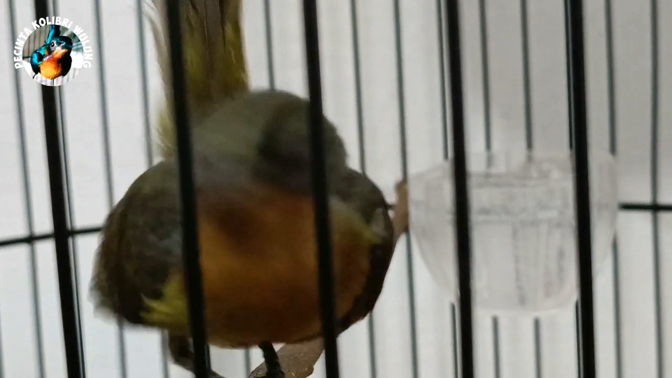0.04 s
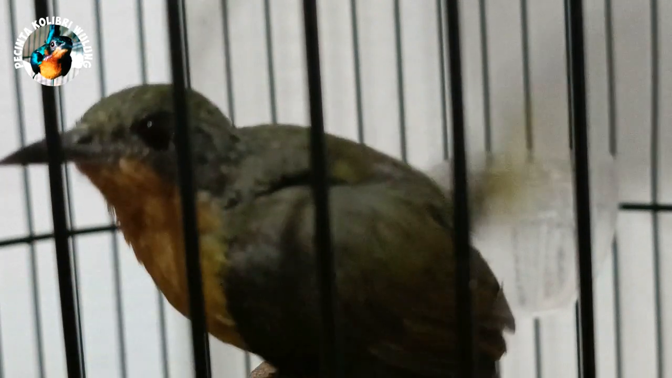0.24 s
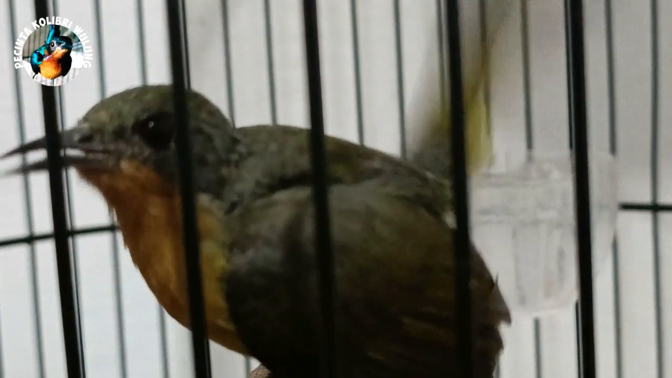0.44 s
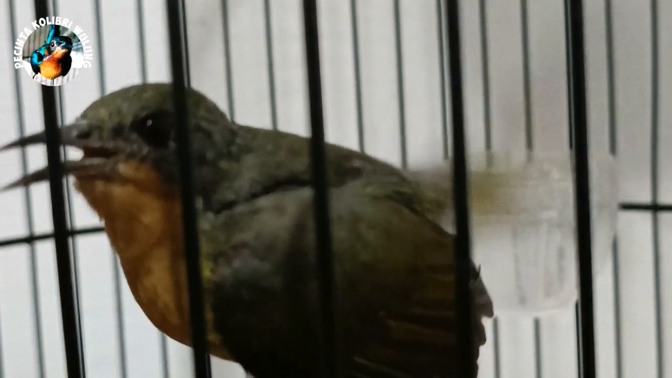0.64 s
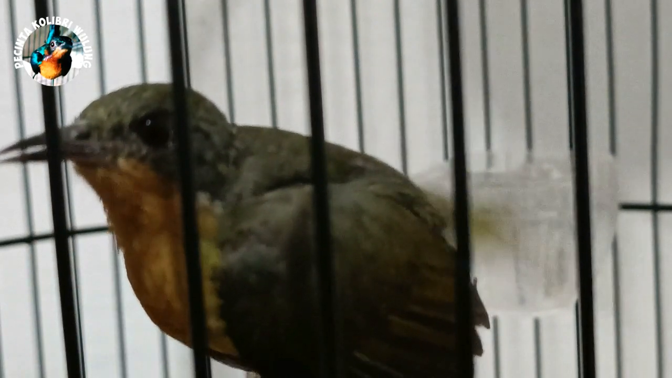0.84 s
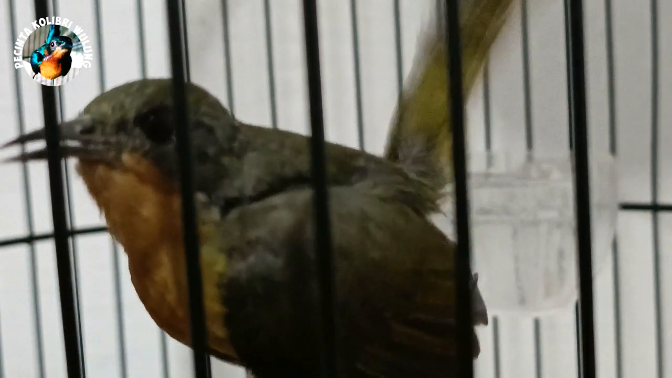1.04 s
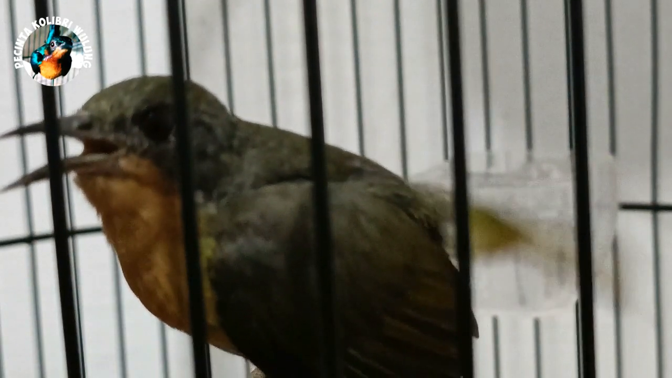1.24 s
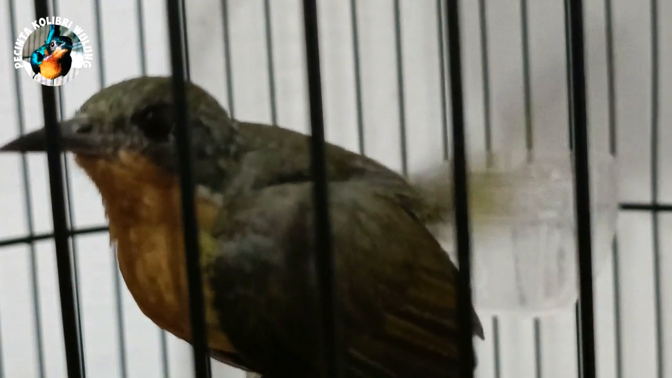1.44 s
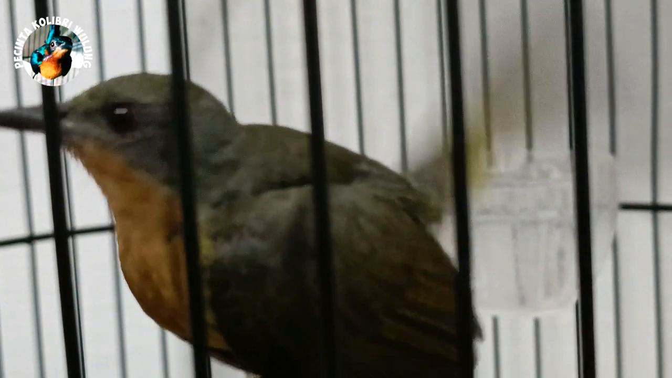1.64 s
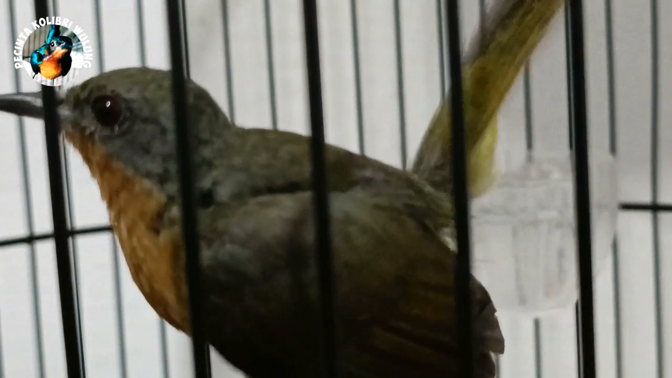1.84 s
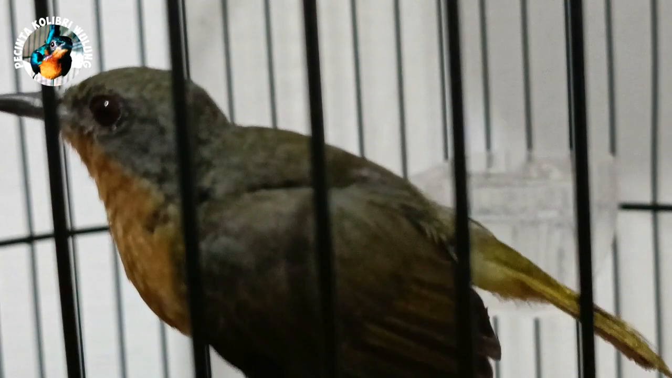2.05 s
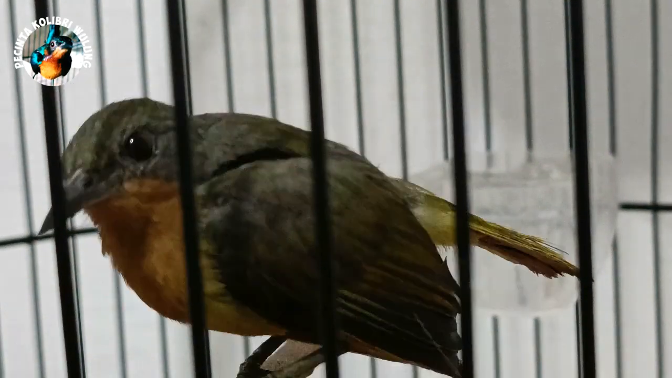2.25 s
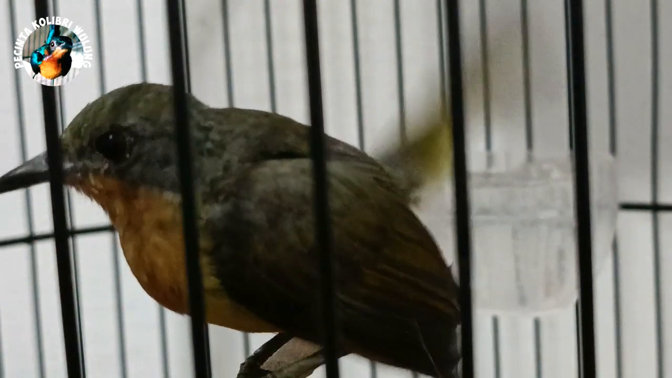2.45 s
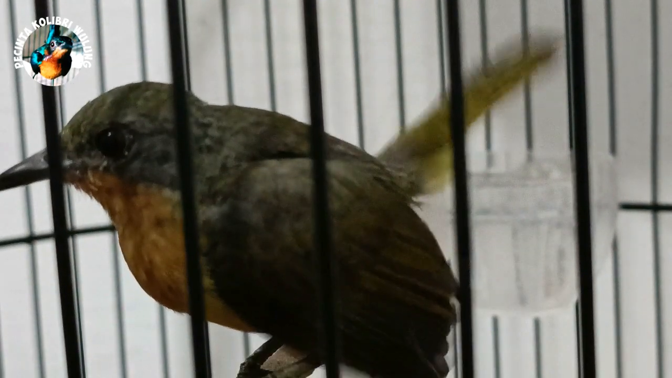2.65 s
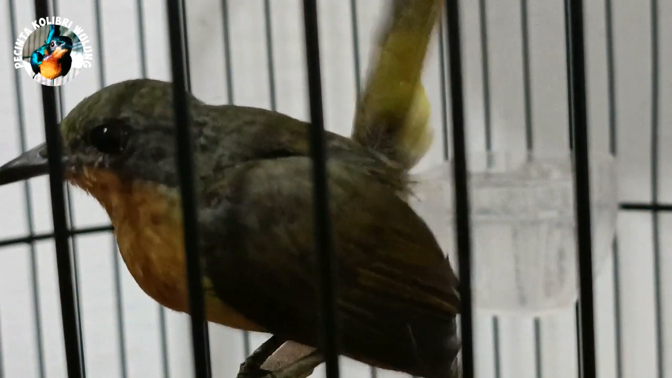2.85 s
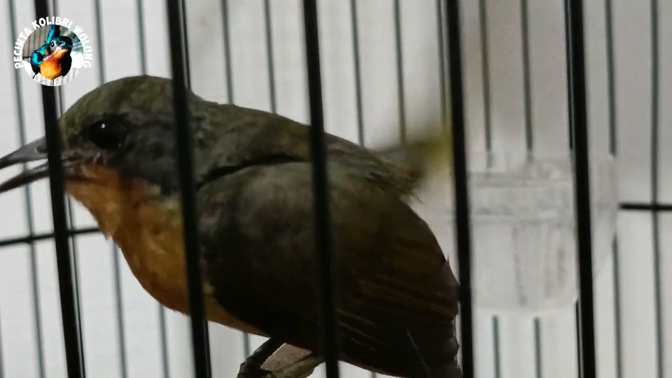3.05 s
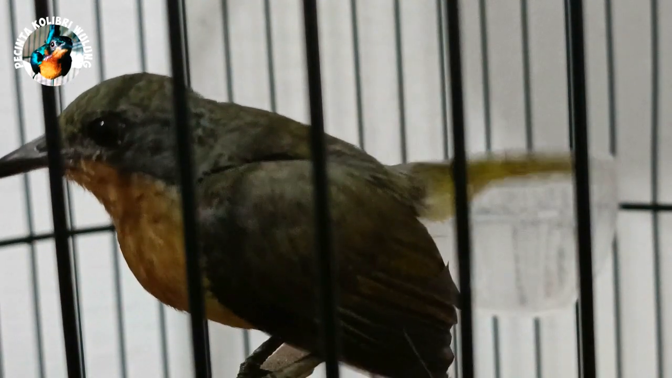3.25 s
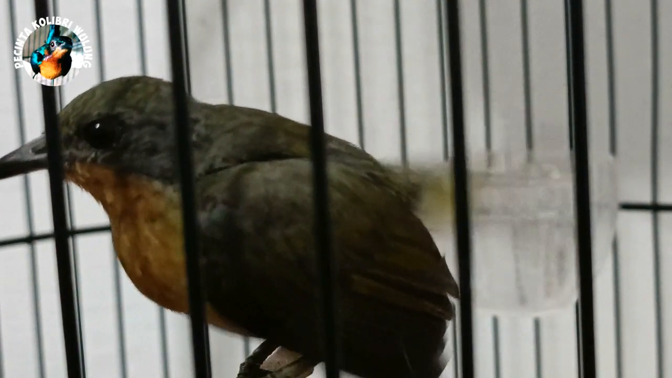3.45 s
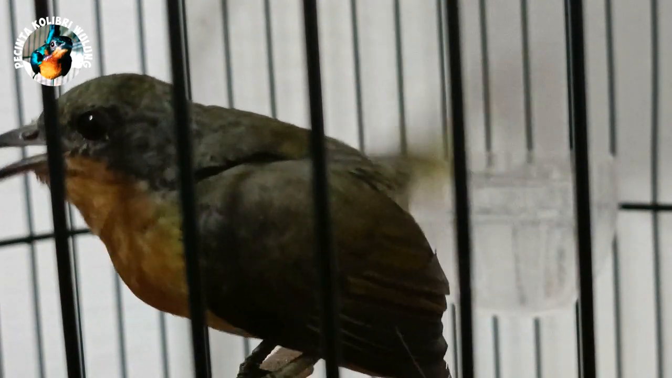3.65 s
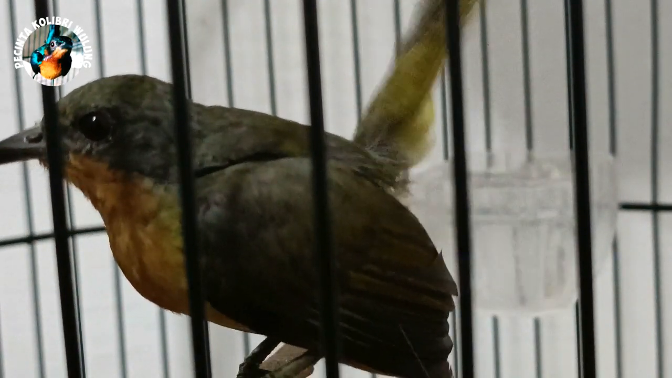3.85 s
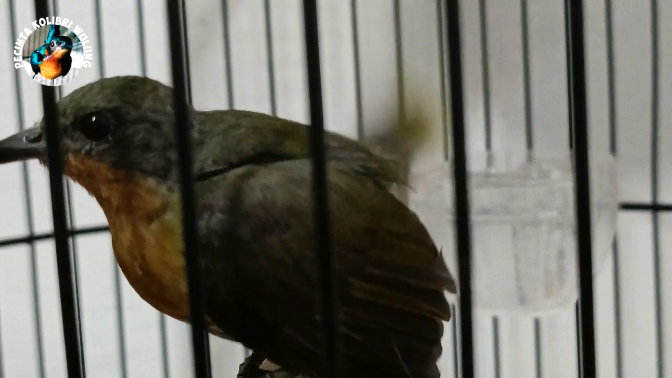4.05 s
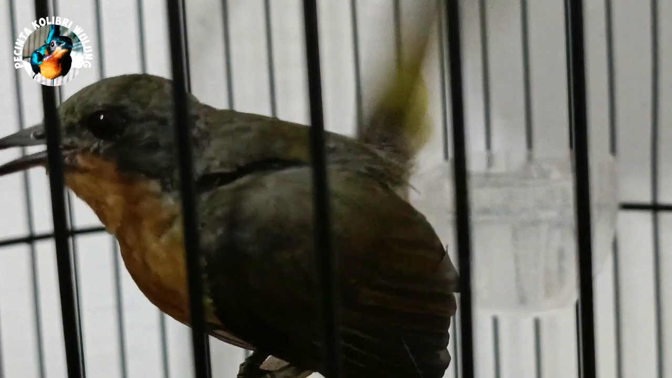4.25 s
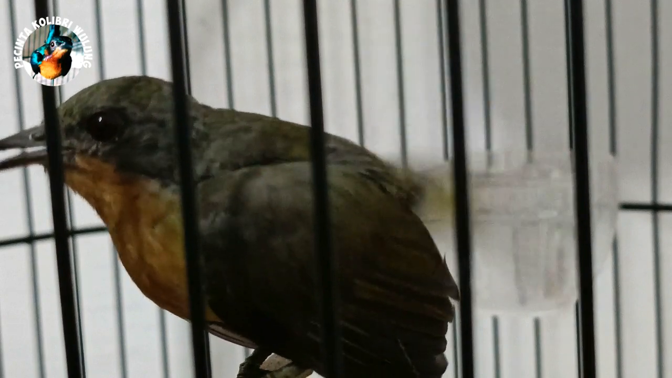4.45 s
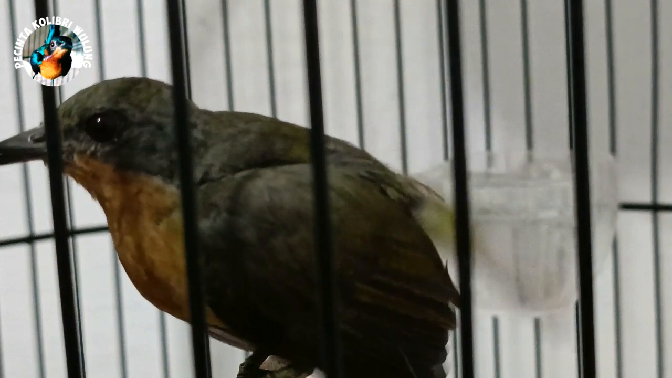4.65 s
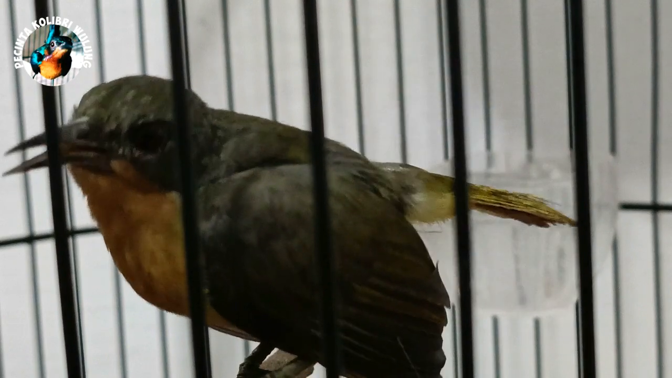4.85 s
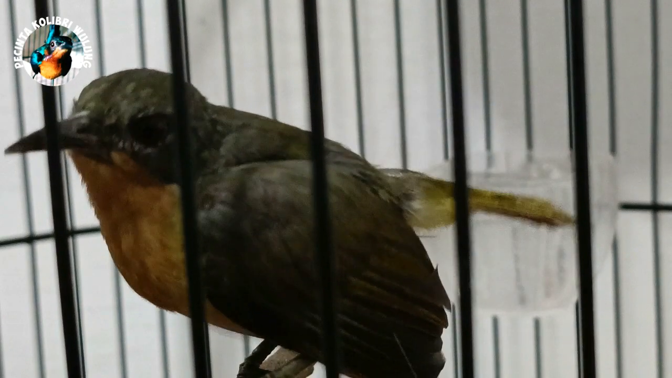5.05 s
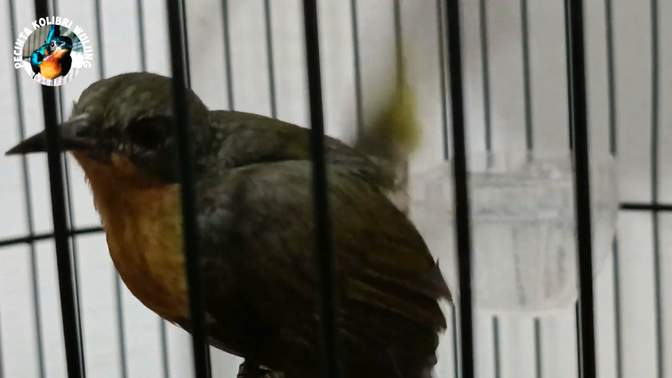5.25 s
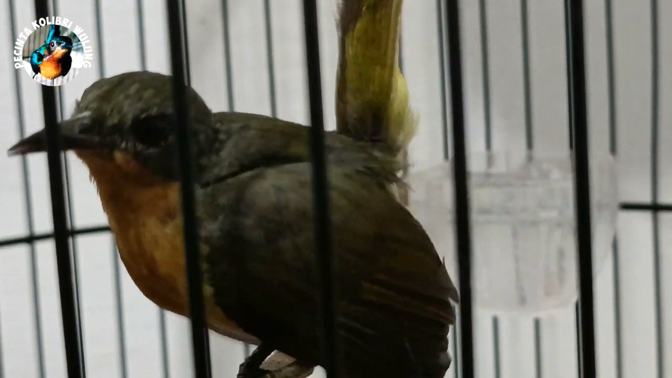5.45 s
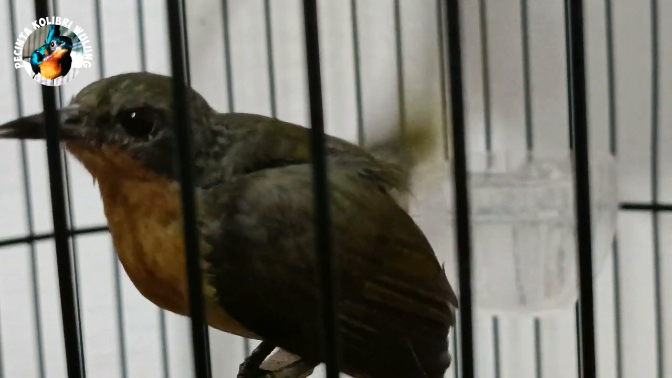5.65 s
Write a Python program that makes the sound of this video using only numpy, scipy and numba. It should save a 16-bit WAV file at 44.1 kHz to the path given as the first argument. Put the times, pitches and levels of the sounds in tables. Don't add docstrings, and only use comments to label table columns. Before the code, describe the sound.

A quiet indoor room, low rumble and faint hiss throughout. At 0.2-0.3 s a caged bird hops: five tiny claw taps on wood, with a thin metallic wire tick. At 0.5 s it whistles loudly, a third of a second gliding from about 2 to nearly 7 kHz, bending slightly down at the crest and snapping off in a quick drop. A similar sweep at 1.0 s has a choked close. Tail feathers rustle almost inaudibly around 1.5 s, then a pause. At 3.05 s comes a short falling whistle, about 7 to 5 kHz; at 3.6 s another, starting with a tiny upward hook. Long rising sweeps return at 4.15 and 4.75 s, ending near 5.1 s; the ring dies into hum. The sound is close, brighter on the left, duller and more echoing on the right, with a third-of-a-second room tail and small limiter ticks and grit on loud notes.

```python
import sys
import numpy as np
from scipy import signal
from scipy.fft import rfft, irfft, next_fast_len
from scipy.io import wavfile
from scipy.ndimage import uniform_filter1d
from numba import njit

SR = 44100
rng = np.random.default_rng(int(sys.argv[2]) if len(sys.argv) > 2 else 0)


def convert_level_to_amplitude(level_db):
    exponent = np.asarray(level_db, float) / 20
    return 10 ** exponent


def log_audio(samples):
    frames = np.atleast_2d(samples).T
    limited = np.clip(frames, -1, 1)
    pcm = np.round(limited * 32767).astype(np.int16)
    wavfile.write(sys.argv[1], SR, pcm)


N = 251811

# [age/s, f/Hz, effort/dB]
ARCH_GLIDE = [(0, 1919, -1), (.015, 2706, 2.4), (0.034, 3333, 1.1), (.06, 3723, -2), (.085, 4435, 6.73),
              (.125, 4798, 0.5), (.235, 6760, -4), (0.289, 6849, -1.36), (.34, 6050, -0.5)]
# [age/s, f/Hz, effort/dB]
FALL_GLIDE = [(0, 6975, -16), (.014, 6720, -15.5), (.03, 6812, 1.1), (.068, 5890, 0), (.1, 5580, -1.5),
              (0.147, 4953, 1)]
HOOKED_GLIDE = [(0, 6830, -2.5), (.008, 7560, -7.5), (0.015, 6940, -7), (0.044, 6770, 6), (.08, 5980, -2),
                (.131, 5030, 3)]
# [t/s, glide length/s, lead at mid-note/s, effort in the high part/dB, effort at the close/dB]
ARCH_NOTES = [
    (.507, .323, -0.0025, 2.5, 3),
    (.995, .336, 0.0036, 1.5, -18),
    (4.135, .348, .013, 0.5, 1.5),
    (4.738, .345, -0.0055, -1.5, 3.5),
]
FALL_NOTES = [
    (3.043, .148, 0.0023, 0.47, 2.5),
]
HOOKED_NOTES = [
    (3.618, .131, .001, 0.2, 5),
]
# [f/Hz, tone level/dB, octave level/dB]
THROAT = [(2036, -52, -38), (3317, -45.5, -20.5), (3755, -30.5, -33), (4480, -21.5, -35),
          (4750, -21.5, -40.5), (5860, -17, -51.5), (6500, -16.5, -35.5), (7440, -18, -26.5)]
# [f/Hz, level/dB]
BEAK = [(1800, -88.5), (3500, -37.5), (5000, -40), (6500, -42.5), (8200, -29), (10000, -44), (12300, -52.5),
        (14000, -39), (15400, -34.5), (17000, -40)]
OVERTONE_DB = [1.5, -3.5, -4.5, -10, -19]
# [f/Hz, level/dB, t60/s]
PERCH_MODES = [(736.7, -2.5, 0.043), (1177, 1, 0.064), (1307, -6, .04), (1620, -7, 0.084),
               (2076, -12, .055), (655, -9, 0.047)]
WIRE_MODES = [(8270, -4.5, 0.027), (8620, 3.5, 0.043), (12980, 0, 0.015), (14500, -7, .012),
              (4190, -17.5, 0.011)]
# [t/s, perch level/dB, wire level/dB]
HOP_TAPS = [
    (.201, -59.5, -71),
    (0.214, -54.5, -50.5),
    (.236, -51.5, -64),
    (0.254, -60.5, -70),
    (.275, -59.5, -70.5),
]
# [f/Hz, t60/s, level/dB]
ROOM_TAIL = [(1500, 0.18, -7), (3360, .28, -8), (4712, 0.31, -8), (6500, 0.38, -13), (7250, 0.41, -15),
             (8610, 0.13, -4.5), (12470, .18, -12), (15000, 0.27, -13)]
# [f/Hz, direct level/dB, room level/dB]
RIGHT_SHADE = [(501, -7, 2.5), (2500, -5, 2.5), (4460, -6, 1), (6970, -6, 3.5), (9180, -15.5, -3),
               (14900, -17, 0)]
# [t/s, peak level/dB]
LEFT_TICKS = [(.617, -36), (.6612, -41), (.6685, -40.5), (.7698, -46), (1.155, -36), (1.159, -38.5),
              (3.0727, -45.5), (3.118, -35.5), (3.665, -36.5), (3.7588, -37), (4.2223, -41.5),
              (4.3222, -39), (4.3399, -37.5), (4.3596, -38.5), (4.414, -44), (4.4566, -47.5), (4.9261, -45),
              (4.9384, -42), (4.9618, -40.5), (5.0387, -40.5)]
RIGHT_TICKS = [(.6923, -45), (.7171, -38.5), (.7938, -44), (.8255, -34), (1.1815, -41.5), (1.3375, -35),
               (3.0835, -44), (3.112, -40.5), (3.6826, -40.5), (4.3755, -53), (4.3915, -42),
               (4.4626, -42.5), (5.0775, -46)]
# [f/Hz, level per Hz/dB]
HUM_COLOUR = [(40, -18), (62, -2.5), (105, -0.5), (140, -6.5), (190, -4), (460, -10.5), (640, -16),
              (2500, -26), (4650, -26), (4950, -34.5), (7500, -31.5), (7850, -26), (11400, -30),
              (13300, -27), (15800, -21.5)]
# [f/Hz, likeness 0-1]
HUM_LIKENESS = [(60, 0.83), (130, 0.6), (290, 0.1), (640, 0.5), (1410, 0), (3100, 0.13), (6820, 0),
                (15000, 0.3)]

# (length s, last pitch Hz, tone choke dB, octave squeak dB)
ARCH_DROP, FALL_DROP = (.015, 3549.5, -4.5, 13.5), (.022, 3749, -1, -2.5)
DROP_BEND = 2
ARCH_PUFF, FALL_PUFF = (-15, .15), (-20, .02)
AIR_FROM_HZ = 5500
CREST_FROM_S, CREST_BLEND_S = 0.19, .05
WOBBLE, TREMBLE = .005, .002
HIGH_FROM_HZ, HIGH_SPAN_HZ = 4500, 1300
FLICK_S, FLICK_DB = (1.4, 1.65), -64
CAGE_DB, CAGE_T60_S = -11, .04
RIGHT_LAG = 12
TICK_LEAK_DB = -19.5
SMALL_TICKS_PER_S, SMALL_TICK_DB, SMALL_TICK_SPREAD_DB = 30, -56, 3
GRIT_DB = -68.5
HUM_DB = -68.5
TOP_HZ, BOTTOM_HZ = 15850, 58


def bird():
    out = np.zeros(N)
    tremble = 1 + TREMBLE * walk(250) + WOBBLE * walk(40)
    effort_db = 2.2 * walk(55)
    air = breath()
    kinds = [(ARCH_NOTES, ARCH_GLIDE, ARCH_DROP, ARCH_PUFF),
             (FALL_NOTES, FALL_GLIDE, FALL_DROP, FALL_PUFF),
             (HOOKED_NOTES, HOOKED_GLIDE, FALL_DROP, FALL_PUFF)]
    for notes, shape, (drop_s, drop_hz, choke_db, squeak_db), (puff_db, puff_t60) in kinds:
        for start, glide_s, lead_s, high_db, close_db in notes:
            age, hz, push_db, drop = muscles(shape, glide_s, lead_s, drop_s, drop_hz)
            i = int(start * SR) + np.arange(len(age))
            extra_db = high_db * np.clip((hz - HIGH_FROM_HZ) / HIGH_SPAN_HZ, 0, 1) + close_db * drop
            phase = 2 * np.pi * np.cumsum(hz * tremble[i]) / SR
            tone_db = on_log(hz, THROAT) + push_db + extra_db + choke_db * np.minimum(3 * drop, 1)
            voice = convert_level_to_amplitude(tone_db) * np.sin(phase)
            octave_db = on_log(hz, THROAT, axis=2) + extra_db + squeak_db * drop + .5 * effort_db[i[::-1]]
            voice += convert_level_to_amplitude(octave_db) * np.sin(2 * phase)
            for order, db in enumerate(OVERTONE_DB, start=3):
                over_db = db + effort_db[i - 900 * order] + on_log(order * hz, BEAK)
                audible = order * hz < .42 * SR
                voice += audible * convert_level_to_amplitude(over_db) * np.sin(order * phase)
            puff_rise = np.minimum(age / (0.062 * puff_t60), 1)
            voice += convert_level_to_amplitude(puff_db - 13.5 - 60 * age / puff_t60) * puff_rise * air[i]
            edges = np.clip(age / 0.0069, 0, 1) * np.clip((age[-1] - age) / 0.002976, 0, 1)
            out[i] = np.sqrt(2) * convert_level_to_amplitude(1.5 + effort_db[i]) * edges * voice
    return out


def muscles(shape, glide_s, lead_s, drop_s, drop_hz):
    s, hz, db = np.transpose(shape)
    age = np.arange(int((glide_s + drop_s) * SR)) / SR
    hurry = lead_s * np.sin(np.pi * np.minimum(age / glide_s, 1)) ** 2
    along = (age + hurry) * s[-1] / glide_s
    drop = np.clip((age - glide_s) / drop_s, 0, 1)
    cornered = [np.interp(along, s, hz), np.interp(along, s, db)]
    glide, push_db = uniform_filter1d(cornered, size=450, mode="nearest")
    crest = np.clip((age - CREST_FROM_S) / CREST_BLEND_S, 0, 1)
    glide += crest * (uniform_filter1d(glide, size=1500, mode="nearest") - glide)
    return age, glide + (drop_hz - glide) * drop ** DROP_BEND, push_db, drop


def breath():
    colour_db = 0.38 * (on_log(np.fft.rfftfreq(N, 1 / SR), BEAK) + 48.5)
    air = irfft(rfft(rng.standard_normal(N)) * convert_level_to_amplitude(colour_db), N)
    return signal.sosfilt(signal.butter(2, AIR_FROM_HZ, "high", fs=SR, output="sos"), air)


def hop():
    out, t = np.zeros(N), np.arange(SR // 4) / SR
    chance = rng.standard_normal((len(HOP_TAPS), len(PERCH_MODES) + len(WIRE_MODES)))
    for (s, perch_db, wire_db), draws in zip(HOP_TAPS, chance):
        modes = [(f, db + perch_db, t60) for f, db, t60 in PERCH_MODES]
        modes += [(f, db + wire_db, t60) for f, db, t60 in WIRE_MODES]
        tap = convert_level_to_amplitude(wire_db - 12.0 - 60 * t / 0.064) * rng.standard_normal(len(t))
        for (f, db, t60), r in zip(modes, draws):
            ring = np.sin(2 * np.pi * f * (1 + 0.00761 * r) * t)
            tap += convert_level_to_amplitude(db + 2.9 * r) * ring * convert_level_to_amplitude(-60 * t / t60)
        add(out, tap, s)
    return out


def flick():
    start, end = FLICK_S
    swell = np.sin(np.pi * np.clip((np.arange(N) / SR - start) / (end - start), 0, 1))
    band = signal.butter(3, [8000, 10200], "band", fs=SR, output="sos")
    return convert_level_to_amplitude(FLICK_DB + 4 * walk(68.4)) * swell * signal.sosfilt(band, rng.standard_normal(N))


def room(x):
    t = np.arange(int(SR * .8)) / SR
    spectrum, hz = rfft(rng.standard_normal((2, len(t)))), np.fft.rfftfreq(len(t), 1 / SR)
    tail = convert_level_to_amplitude(CAGE_DB) * fading(t, CAGE_T60_S) * rng.standard_normal((2, len(t))) * (t > .001)
    arrival = np.clip((t - .003) / 0.0079, 0, 1)
    for centre in 500 * 2 ** np.arange(0, 5.6, .5):
        octaves = np.log2(np.maximum(hz, 1) / centre)
        share = np.cos(np.pi * np.clip(octaves, -.5, .5)) ** 2
        shape = fading(t, on_log(centre, ROOM_TAIL)) * arrival
        tail += convert_level_to_amplitude(on_log(centre, ROOM_TAIL, axis=2)) * irfft(spectrum * share, len(t)) * shape
    return signal.fftconvolve(x[None], tail, axes=1)[:, :N]


def shade(x, axis):
    return irfft(rfft(x) * convert_level_to_amplitude(on_log(np.fft.rfftfreq(N, 1 / SR), RIGHT_SHADE, axis=axis)), N)


@njit
def limiter_gain(size, top, attack, release):
    gain, e = np.empty(len(size)), 0.
    for i in range(len(size)):
        e += (size[i] - e) * (attack if size[i] > e else release)
        gain[i] = min(1., top / (e + 1e-9))
    return gain


def ticks(size):
    out, half = np.zeros((2, N)), 90
    t = np.arange(-half, half + 1) / SR
    kick = -t / .00008 * np.exp(.5 - (t / .00008) ** 2 / 2)
    wake = 4 * np.exp(-(t / 0.00027) ** 2)
    for rows, leak_db in (LEFT_TICKS, [[0], [TICK_LEAK_DB]]), (RIGHT_TICKS, [[TICK_LEAK_DB], [0]]):
        chance = uniform_filter1d(rng.standard_normal((len(rows), len(t))), size=7, axis=1)
        for (s, db), rough in zip(rows, chance):
            shape = kick + 0.2 * np.gradient(rough) * wake
            add(out, convert_level_to_amplitude(db - 3.5 + np.array(leak_db)) * shape, s - half / SR)
    caught = rng.random((2, N)) < SMALL_TICKS_PER_S / SR * (size / .1) ** 2
    small = caught * convert_level_to_amplitude(SMALL_TICK_DB + SMALL_TICK_SPREAD_DB * rng.standard_normal((2, N)))
    return out + signal.fftconvolve(small, kick[None], mode="same", axes=1)


def grit(size):
    grains = rng.standard_normal((2, N)) * convert_level_to_amplitude(3.84 * rng.exponential(size=(2, N)))
    band = signal.butter(2, [600, 3600], "band", fs=SR, output="sos")
    return signal.sosfilt(band, convert_level_to_amplitude(GRIT_DB) * grains * (size / 0.25) ** 2)


def hum():
    hz = np.fft.rfftfreq(N, 1 / SR)
    like = np.clip(on_log(hz, HUM_LIKENESS), 0, 1)
    mid, side = rfft(rng.standard_normal((2, N))) * convert_level_to_amplitude(on_log(hz, HUM_COLOUR))
    both = irfft(np.sqrt(1 + like) * mid + np.sqrt(1 - like) * side * np.array([[1], [-1]]), N)
    return both * convert_level_to_amplitude(HUM_DB + 2.0 + 0.5 * walk(2.6)) / np.std(both.mean(axis=0))


def on_log(hz, table, axis=1):
    rows = np.array(table, float)
    return np.interp(np.log(np.maximum(hz, 1)), np.log(rows[:, 0]), rows[:, axis])


def walk(rate):
    k = int(SR / rate)
    held = rng.standard_normal(N)[np.arange(N) // k]
    return 1.3 * uniform_filter1d(uniform_filter1d(held, k), k)


def fading(t, t60):
    return np.sqrt(2 * np.log(1000) / t60 / SR) * convert_level_to_amplitude(-60 * t / t60)


def add(out, sound, s):
    i = int(s * SR)
    out[..., i:i + sound.shape[-1]] += sound[..., :out.shape[-1] - i]


def scene():
    near = bird() + hop()
    left_room, right_room = room(near)
    near = near + flick()
    left = near + left_room
    right = shade(np.roll(near, RIGHT_LAG), axis=1) + shade(right_room, axis=2)
    return np.array([left, right]) + hum()


def band_limit(x):
    return signal.sosfilt(signal.butter(12, 16800, fs=SR, output="sos"), x)


def record(dry):
    size = np.abs(signal.hilbert(dry, next_fast_len(N)))[:, :N]
    gain = np.array([limiter_gain(e, convert_level_to_amplitude(-11), .07, .001) for e in size])
    limited = dry * gain + ticks(size * gain) + grit(size * gain)
    top = signal.ellip(10, .2, 60, TOP_HZ, fs=SR, output="sos")
    bottom = signal.butter(4, BOTTOM_HZ, "high", fs=SR, output="sos")
    trimmed = signal.sosfilt(np.vstack([top, bottom]), limited)
    return band_limit(trimmed)


dry = scene()
out = record(dry)
log_audio(out)
```